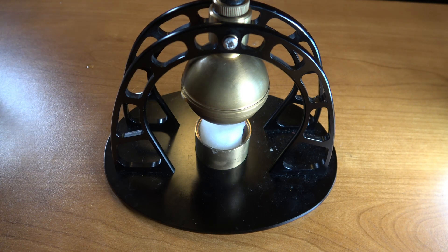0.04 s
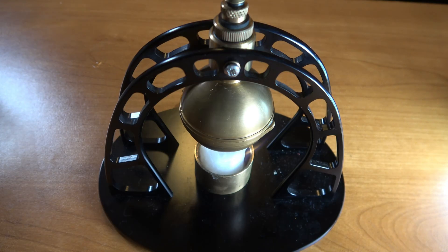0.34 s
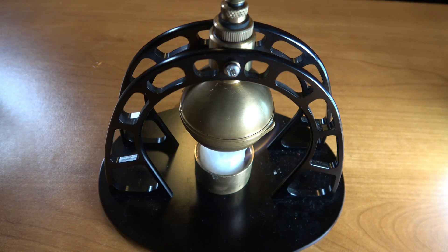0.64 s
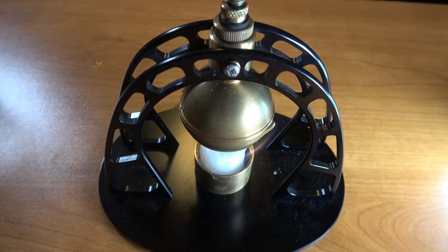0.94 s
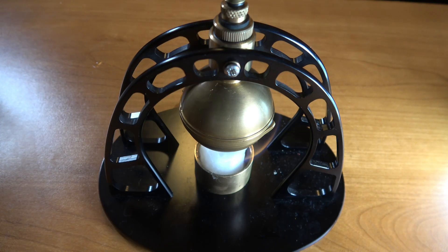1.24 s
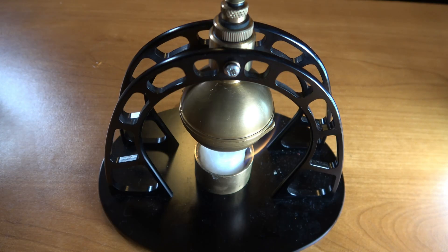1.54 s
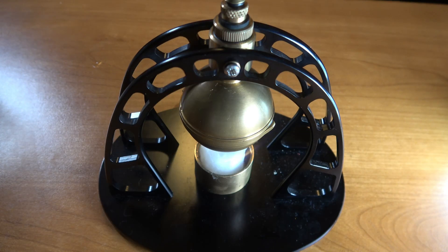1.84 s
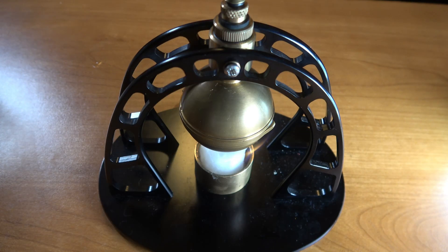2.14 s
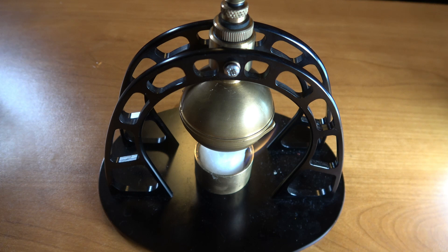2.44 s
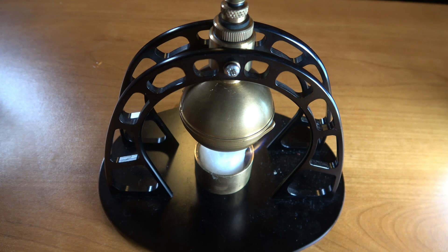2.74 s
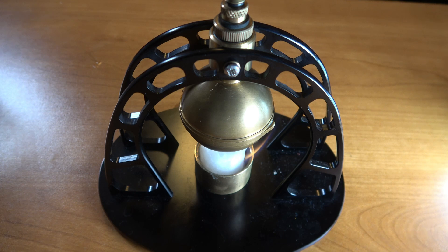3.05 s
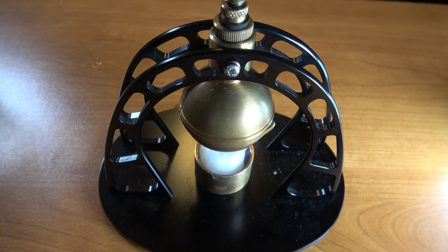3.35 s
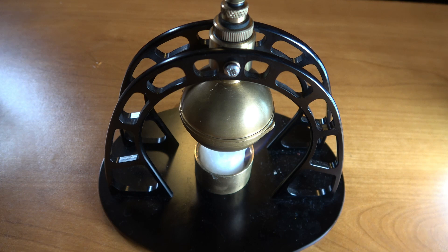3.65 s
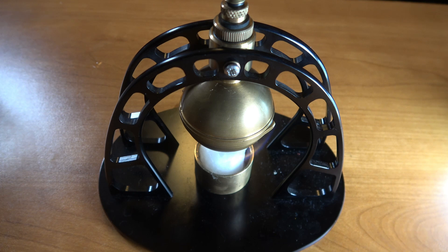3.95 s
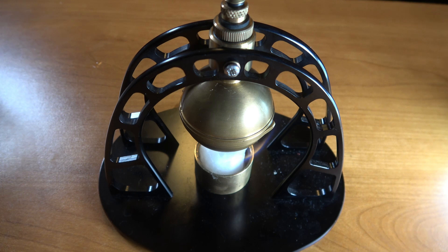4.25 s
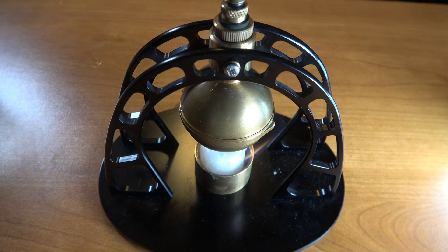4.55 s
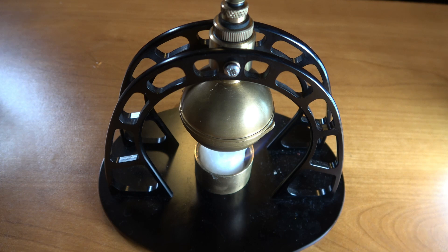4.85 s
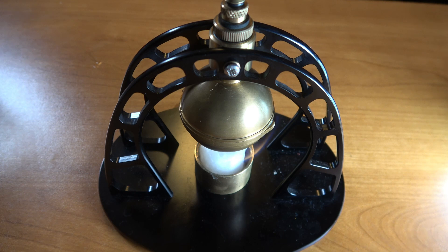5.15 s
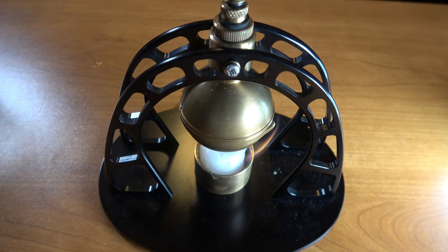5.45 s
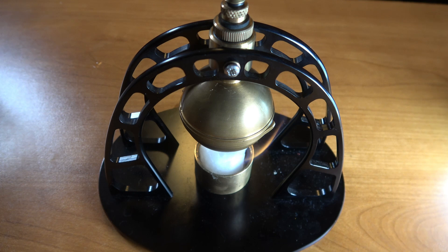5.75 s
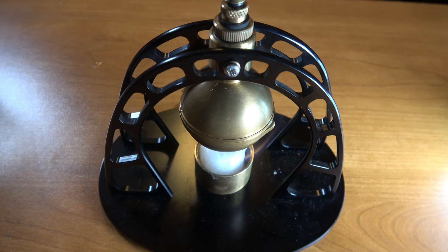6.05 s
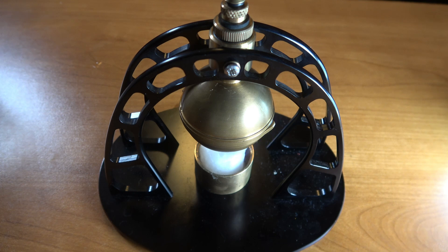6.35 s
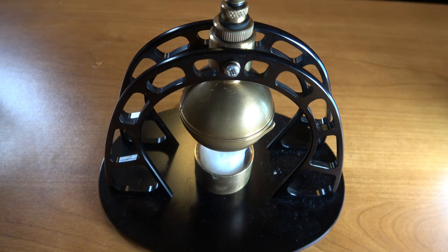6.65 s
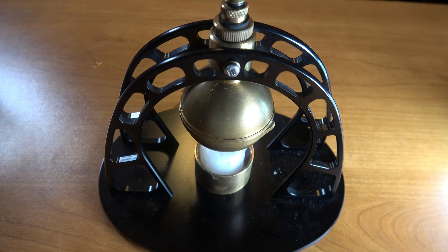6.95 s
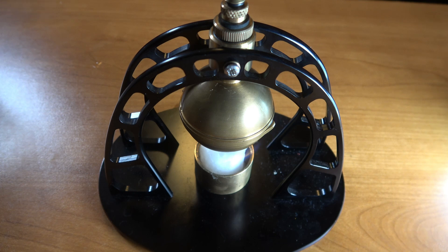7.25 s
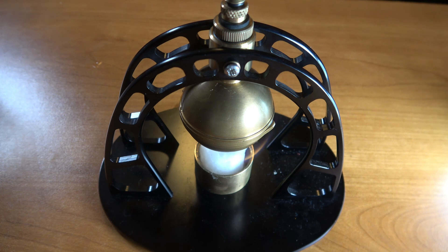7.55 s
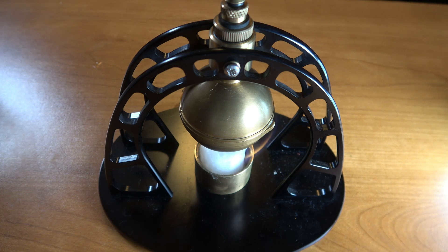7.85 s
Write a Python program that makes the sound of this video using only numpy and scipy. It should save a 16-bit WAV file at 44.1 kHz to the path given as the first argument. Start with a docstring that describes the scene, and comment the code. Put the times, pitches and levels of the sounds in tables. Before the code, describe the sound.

Close up in a quiet room, a small steam boiler ticks briefly and breaks into a long, fizzy hiss. The jet wavers with the pressure, choking and sputtering again and again as it spits water. Late on it sinks while something is handled nearby: three sharp knocks, then a hollow slide with soft low thumps. The hiss comes back to strength over a faint room murmur.

```python
"""Ticks and short bursts, then a long hiss of steam that keeps choking and coughing.
It is a small brass boiler, close by, over its burner on a wooden table. A jet opens and hisses with
the pressure; water blocks it again and again and is flung out as spray. Near the end something is
handled in the room: three knocks and a hollow slide, with low thumps beneath, before the dry hiss
returns. Behind it are faint echoes and the low murmur of the room."""
import sys
import numpy as np
from scipy import signal
from scipy.fft import rfft, irfft, next_fast_len
from scipy.io import wavfile

SR = 44100
rng = np.random.default_rng(int(sys.argv[2]) if len(sys.argv) > 2 else 0)


def log_audio(samples):
    """Write samples as a 16-bit WAV file to the path given in sys.argv[1]."""
    # one column per channel
    frames = np.atleast_2d(samples).T
    # limit to full scale, then quantise
    limited = np.clip(frames, -1, 1)
    pcm = np.round(limited * 32767).astype(np.int16)
    wavfile.write(sys.argv[1], SR, pcm)


N = 352359
FFT_SIZE = next_fast_len(N, real=True)
T, HZ = np.arange(N) / SR, np.fft.rfftfreq(FFT_SIZE, 1 / SR)

# water blocks the nozzle, then is flung out: t/s, sag of the jet/dB, half-length/s, cough level/dB
CHOKES = [(0.821, 2.5, 0.023, -46), (1.22, 3.5, 0.072, -64.0), (1.39, 4.5, 0.035, -60),
          (1.54, 2.5, 0.039, -64), (2.008, 4.5, 0.045, -55), (2.82, 6.9, 0.043, -50.5),
          (3.398, 8, 0.073, -56), (3.6, 2.5, 0.088, -62), (3.85, 6.5, 0.044, -51), (4.016, 4, 0.12, -70),
          (4.295, 7.5, 0.033, -54.5), (4.637, 4.5, 0.067, -67), (4.819, 6, 0.049, -57.5),
          (5.35, 6.0, 0.038, -55), (5.915, 9.5, 0.031, -59), (6.166, 2, 0.049, -62),
          (6.386, 5.5, 0.068, -69), (6.857, 3.1, 0.017, -61), (7.32, 3.5, 0.032, -68),
          (7.74, 8, 0.045, -68)]
# pitches that the nozzle, frame and table boost or weaken: f/Hz, width/Hz, gain/dB
BODY_RESONANCES = [(1840, 87, -4.5), (2850, 260, 4), (3050, 120, -4), (3620, 260, 2), (3880, 98, -6.5),
                   (4400, 180, 1.5), (5130, 170, -1), (5540, 500, 2.5), (6540, 210, 1.8), (7630, 450, 2),
                   (8000, 220, -2), (8270, 250, 1), (8970, 400, -2.5), (9750, 300, 1), (9860, 250, -1),
                   (12800, 440, -0.5)]
# low pitches at which the room rings: f/Hz, width/Hz, gain/dB
ROOM_MODES = [(79, 12, 6), (133, 20, 4), (173, 22, 1.5), (218.5, 8.7, 7), (269, 16, 4), (311, 9.2, 5),
              (379, 15, 6)]


def jet(push_db, sag_db, rush_db, opens_s=0.265, rise_s=0.0062, split_hz=5500, drops_per_s=700):
    """Swirling steam: small swirls hiss high, large ones fill in below, and carried droplets fizz."""
    hiss_spectrum = [(300, -23), (900, -12.5), (1700, -10.5), (2200, -6), (4000, -4.5), (6000, -4.5),
                     (7300, -.5), (9000, -2), (10600, -2.5), (12000, -5.5), (13700, -7), (14800, -12.5),
                     (15800, -16)]  # tone of the dry steam: f/Hz, level/dB
    colour_db = curve_over_hz(hiss_spectrum) + resonances(BODY_RESONANCES)
    high_db = -41.5 + push_db - sag_db
    low_db = -48 + 1.27 * push_db - 0.9 * sag_db + 0.33 * rush_db
    low_share = 1 / (1 + (HZ / split_hz) ** 6)
    small_swirls = noise(colour_db + 10 * np.log10(1 - low_share + 1e-9))
    small_swirls *= gain_of(high_db + 0.57 * wobble(40))
    large_swirls = noise(colour_db + 10 * np.log10(low_share))
    large_swirls *= gain_of(low_db + 0.57 * wobble(30))
    drops = (rng.random(N) < drops_per_s / SR) * rng.standard_normal(N)
    mist = gain_of(high_db - 13) * unit_rms(ring(drops[None], colour_db))
    opening = np.clip((T - opens_s) / rise_s, 0, 1)
    flutter = gain_of(0.6 * wobble(9.7))
    return (small_swirls + large_swirls + mist) * opening * flutter


def steam_state(rebound=0.19, clear_lag_s=0.072):
    """Push, sag and low rush over time: each choke weakens the jet, then trapped steam pushes out."""
    pressure = [(0.27, -2.5), (0.74, 2.3), (0.9, -0.5), (1.15, 2), (1.93, -1), (2.68, 1.2), (3.2, -3.0),
                (3.71, -1.3), (4.2, 1.3), (4.49, -3.5), (5.2, -2.5), (5.42, 1.3), (5.55, 2), (5.78, -0.7),
                (6.47, -5), (6.62, -11.5), (6.95, -7.5), (7.38, -5.5), (7.78, 0.6), (7.99, -1.5)]  # boiler pressure, as the strength of the free jet: t/s, gain/dB
    rush_strength = [(0.27, 1.3), (0.9, 1), (1.4, 0.4), (1.84, -2.5), (2.28, -1), (2.59, 2), (3.51, -2),
                     (3.86, 2.5), (4.11, -0.9), (5.11, -1.8), (5.56, 1.4), (6.23, -1), (6.85, 0.5),
                     (7.22, -1), (7.51, 9.5), (7.66, 4.5), (7.99, 4)]  # drives the low rush, peaking at the slide: t/s, gain/dB
    push_db, sag_db = curve_over_time(pressure), np.zeros(N)
    for at_s, depth_db, half_s, _ in CHOKES:
        sag_db += depth_db * swell(at_s, half_s)
        push_db += rebound * depth_db * swell(at_s + clear_lag_s, half_s=0.077)
    return push_db, sag_db, curve_over_time(rush_strength)


def rush_and_slide(push_db, sag_db, rush_db, starts_s=0.133, gap_s=0.264, roughness_db=1.5):
    """A low, lumpy rush under the hiss; near the end, the hollow slide of something being handled."""
    rush_spectrum = [(60, -24), (160, -7), (300, -1.5), (440, -4), (600, 1), (1100, 0.5), (1450, -2),
                     (2100, 0), (3200, -9), (6000, -10.5), (15000, -25)]  # tone of the rush: f/Hz, level/dB
    hollowness = [(6.3, 0.06), (6.9, 0.3), (7.3, 0.98), (7.6, 1), (7.85, 0.26)]  # how much of the sound is the hollow slide: t/s, share/0-1
    slide_resonances = [(743, 78, 5.5), (1140, 220, 1.5), (1435, 260, 9), (1910, 140, 2.5), (4330, 380, 13),
                        (5000, 200, 13)]  # ringing of the slide: f/Hz, width/Hz, gain/dB
    colour_db = curve_over_hz(rush_spectrum) + resonances(ROOM_MODES)
    hollow = curve_over_time(hollowness)
    rush = np.sqrt(1 - hollow) * noise(colour_db)
    slide = np.sqrt(hollow) * noise(colour_db + resonances(slide_resonances))
    starting = np.clip((T - starts_s) / 0.0047, 0, 1)
    gap = swell(gap_s, half_s=0.0067)  # the rush cuts out just before the jet breaks through
    level_db = -56.5 + 0.27 * push_db - 0.42 * sag_db + 1.34 * rush_db
    level_db += 2 * (T < gap_s)  # a little louder before the jet opens
    return (rush + slide) * starting * (1 - gap) * gain_of(level_db + roughness_db * wobble(60))


def coughs(lag_s=0.062, half_s=0.053):
    """Just after each choke, its water leaves as a soft puff of spray."""
    cough_spectrum = [(150, -17), (450, -6), (900, -4.5), (1600, -0.5), (2600, -2), (4500, -8), (9000, -22),
                      (15000, -34)]  # tone of the puff: f/Hz, level/dB
    puffs = sum(gain_of(db) * swell(at_s + lag_s, half_s) for at_s, _, _, db in CHOKES)
    return puffs * noise(curve_over_hz(cough_spectrum) + resonances(BODY_RESONANCES))


def bursts(peak_db=8, peak_width_share=0.18):
    """Short noisy bursts, each with its own pitch; three late ones are the room ringing after knocks."""
    # one row per burst: t/s, level/dB, rise/s, time to fade 60 dB/s, brightness/(dB per octave), f/Hz
    events = [(.126, -60, .002, 0.07, 8, 4100), (.143, -55, 0.0055, 0.31, 7, 2000),
              (.27, -42.5, 0.0054, 0.21, 3, 2980), (2.648, -49, .016, 0.09, -6, 600),
              (6.959, -41.5, 0.009, 0.21, 2, 940), (7.053, -44.5, .008, 0.2, 2, 1880),
              (7.104, -39.5, 0.009, 0.21, 0.5, 370), (7.285, -45.5, 0.0019, 0.26, -0.5, 1500)]
    burst_spectrum = [(60, -25), (170, -6), (330, 8), (480, 0), (750, 4), (2000, 0), (4500, -2), (8000, -5),
                      (11000, -13), (15000, -32)]  # tone of the bursts: f/Hz, level/dB
    ringing = [(930, 64, 1.5), (1470, 220, 2), (1910, 160, 9.5), (3050, 140, 5), (4260, 220, 6.5)]  # pitches that ring in every burst: f/Hz, width/Hz, gain/dB
    colour_db = curve_over_hz(burst_spectrum) + resonances(BODY_RESONANCES) + resonances(ringing)
    octaves = np.log2(np.maximum(HZ, 300) / 1000)
    sound = np.zeros((2, N))
    for at_s, db, rise_s, fade_s, brightness_db, pitch_hz in events:
        rise = np.clip((T - at_s) / rise_s, 0, 1)
        fade = gain_of(-60 * np.clip((T - at_s - rise_s) / fade_s, 0, 2))
        peak = resonances([(pitch_hz, peak_width_share * pitch_hz, peak_db)])
        sound += gain_of(db) * rise * fade * noise(colour_db + brightness_db * octaves + peak, lean=0)
    return sound


def ticks_and_knocks(trim_db=-1, lag_s=0.00093, scatter_s=0.0015, samples=400):
    """Sharp clicks: faint ticks at the start, three knocks in the room near the end."""
    hits = [(0.1245, -31), (0.1435, -31), (.189, -37), (0.216, -37), (.2366, -39), (.2582, -36),
            (6.9574, -24), (7.0519, -24), (7.103, -27)]  # the ticks and knocks: t/s, level before the trim/dB
    click_spectrum = [(200, -22), (1500, -8), (3200, -5), (4200, 2), (5200, -6), (7300, -5), (10500, -12),
                      (15000, -28)]  # tone of a click: f/Hz, level/dB
    clicks = np.zeros((1, N))
    for at_s, db in hits:
        click = 0.18 * rng.standard_normal(samples) * np.exp(-T[:samples] / scatter_s)
        click[0] = 1  # one sharp spike, ahead of its short noisy tail
        start = round((at_s + lag_s) * SR)
        clicks[0, start:start + samples] += gain_of(db + trim_db) * click
    return ring(clicks, curve_over_hz(click_spectrum))


def thumps():
    """Low thumps and rumble under the late knocks and slide."""
    surges = [(6.852, -61, 0.021), (6.996, -55.5, .03), (7.126, -52.5, 0.066), (7.352, -57.5, .13),
              (7.57, -52.5, 0.16)]  # one row per thump: t/s, level/dB, half-length/s
    rumble_spectrum = [(50, -18), (110, -8), (165, -0.5), (220, -1), (300, -2), (420, -7.5), (900, -18),
                       (4000, -70)]  # tone of the thumps: f/Hz, level/dB
    loudness = sum(gain_of(db) * swell(at_s, half_s) for at_s, db, half_s in surges)
    return loudness * noise(curve_over_hz(rumble_spectrum))


def echoes(sound):
    """Nearby walls and furniture send back faint, slightly late copies of the sound."""
    reflections = [(.0087, 0.076, .08), (.0093, .045, .02), (.01, .02, .04), (.0121, 0.017, -0.017),
                   (.0126, -.05, 0), (.0164, -0.045, -.04), (.0184, .04, .01)]  # one row per bounce: delay/s, left gain, right gain
    bounced = np.zeros((2, N))
    for delay_s, left, right in reflections:
        delayed = np.pad(sound, ((0, 0), (round(delay_s * SR), 0)))[:, :N]
        bounced += np.array([[left], [right]]) * delayed
    return bounced


def room(air_db=-60.5, hum_hz=175.6, waver_db=3.0):
    """The room's air murmurs, and a faint low hum swells once."""
    hum_levels = [(4.85, -85), (5.1, -71), (5.45, -72), (5.62, -61.5), (5.8, -71)]  # rise and fall of the hum: t/s, level/dB
    air_spectrum = [(18, -13), (35, -12), (60, -11.5), (130, -5), (260, -4.5), (400, -14), (600, -7.5),
                    (900, -14), (2100, -20), (15000, -33)]  # tone of the murmur: f/Hz, level/dB
    pitch_hz = hum_hz + 1.784 * wobble(5.8)
    hum = np.sqrt(2) * np.sin(2 * np.pi * np.cumsum(pitch_hz) / SR)
    humming = (T > hum_levels[0][0]) & (T < hum_levels[-1][0])
    hum *= humming * gain_of(curve_over_time(hum_levels) + waver_db * wobble(8))
    return hum + gain_of(air_db) * noise(curve_over_hz(air_spectrum) + resonances(ROOM_MODES))


def noise(colour_db, lean=1):
    """Stereo noise with the given tone, nearly alike on both sides; lean=0 centres it."""
    likeness = [(60, .96), (250, 0.89), (640, 0.94), (1400, 0.99), (3100, 1), (6800, 0.97), (9000, .875),
                (15000, 0.83)]  # how alike left and right are: f/Hz, share/0-1
    balance = [(100, 0), (250, 1.5), (700, 1), (1300, 0), (2400, -1.5), (4400, -0.9), (8000, -2.2),
               (15000, -2)]  # which side is louder: f/Hz, left minus right/dB
    left, unrelated = rfft(rng.standard_normal((2, FFT_SIZE)))
    alike = curve_over_hz(likeness)
    right = alike * left + np.sqrt(1 - alike ** 2) * unrelated
    side_db = lean * curve_over_hz(balance) * np.array([[0.5], [-0.5]])
    spectrum = np.array([left, right]) * gain_of(colour_db + side_db)
    return unit_rms(irfft(spectrum, FFT_SIZE)[:, :N])


def ring(clicks, colour_db, samples=2048):
    """Turns each click into a short ring with the given tone."""
    cepstrum = irfft(colour_db * np.log(10) / 20, FFT_SIZE)[:samples]  # one side only: no early ringing
    cepstrum[0] = 0
    shape = irfft(np.exp(rfft(2 * cepstrum, 2 * samples)))[:samples]
    return signal.oaconvolve(clicks, shape[None] / abs(shape).max(), axes=1)[:, :N]


def wobble(rate_hz):
    """A random drift of typical size 1, up to about the given rate."""
    spectrum = rfft(rng.standard_normal(FFT_SIZE)) / (1 + (HZ / rate_hz) ** 2)
    return unit_rms(irfft(spectrum, FFT_SIZE)[:N])


def swell(at_s, half_s):
    """A smooth rise and fall of height 1 around a moment."""
    return np.exp(-np.minimum(((T - at_s) / half_s) ** 2, 50))


def resonances(modes):
    """Bell-shaped peaks and dips, in dB over frequency."""
    return sum(db / (1 + (2 * (HZ - hz) / width) ** 2) for hz, width, db in modes)


def curve_over_hz(points):
    """Joins points with straight lines over log frequency."""
    hz, value = np.transpose(points)
    return np.interp(np.log(HZ + 1), np.log(hz + 1), value)


def curve_over_time(points):
    """Joins points with straight lines, one value per sample."""
    return np.interp(T, *np.transpose(points))


def gain_of(db):
    """Turns decibels into a multiplier."""
    return 10 ** (np.asarray(db) / 20)


def unit_rms(x):
    """Scales a signal to an average strength (rms) of 1."""
    return x / np.sqrt(np.mean(x ** 2) + 1e-20)


def scene():
    """The boiler and the handling noises, their faint echoes, and the room."""
    steam = steam_state()
    direct = jet(*steam) + rush_and_slide(*steam) + coughs() + thumps() + ticks_and_knocks() + bursts()
    return direct + echoes(direct) + room()


def record(dry, cutoff_hz=15820):
    """Removes the very highest treble."""
    lowpass = signal.firwin(1023, cutoff_hz, window=("kaiser", 9), fs=SR)
    return signal.oaconvolve(dry, lowpass[None], "same")


dry = scene()
out = record(dry)
log_audio(out)
```